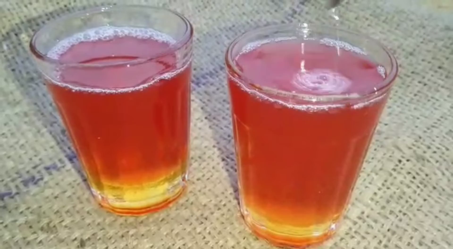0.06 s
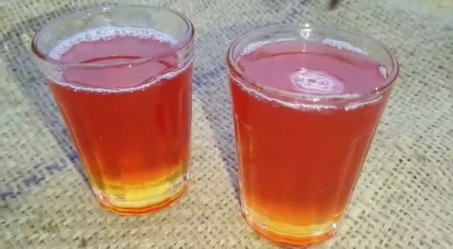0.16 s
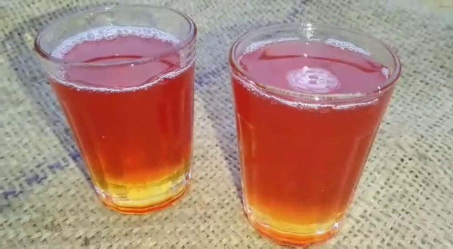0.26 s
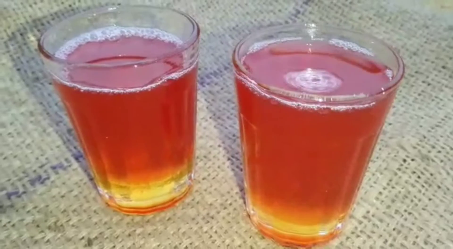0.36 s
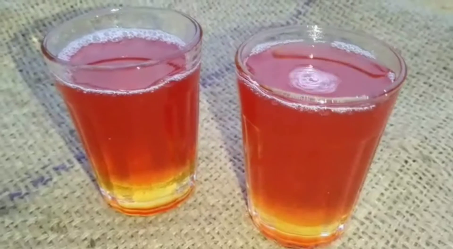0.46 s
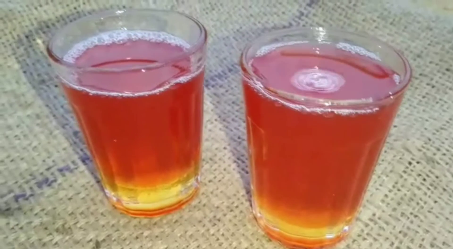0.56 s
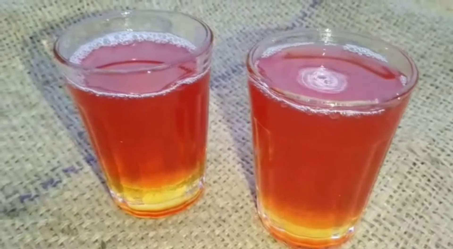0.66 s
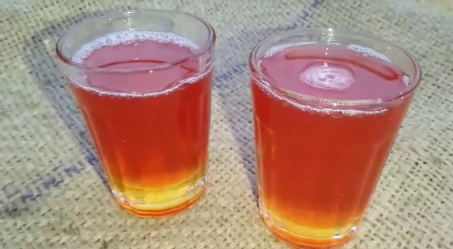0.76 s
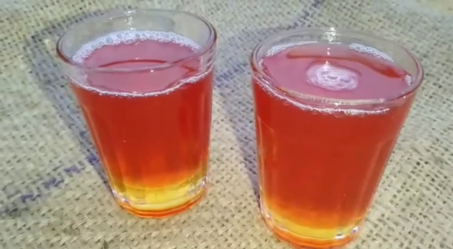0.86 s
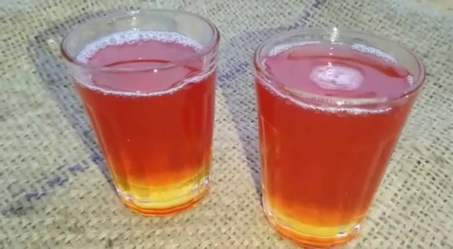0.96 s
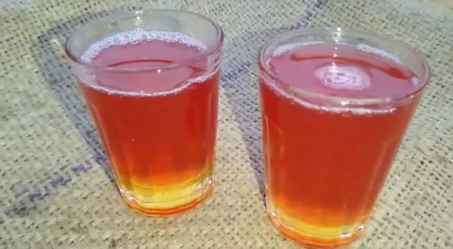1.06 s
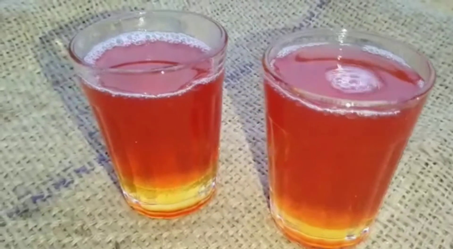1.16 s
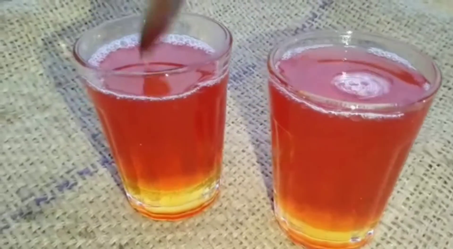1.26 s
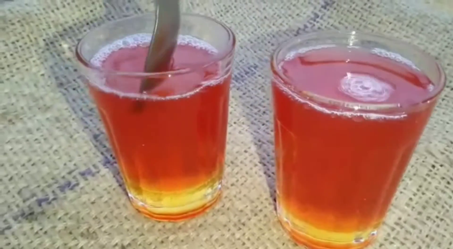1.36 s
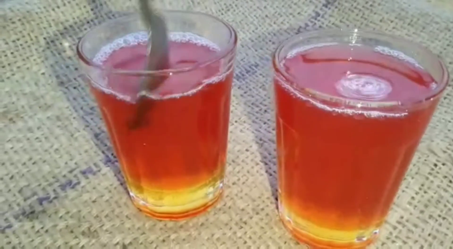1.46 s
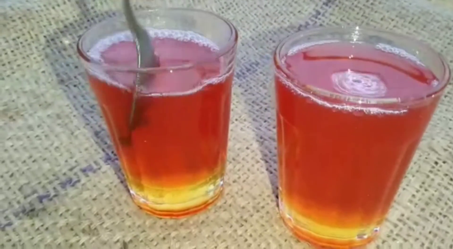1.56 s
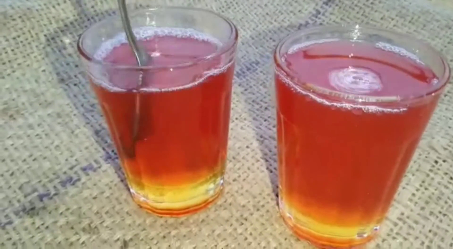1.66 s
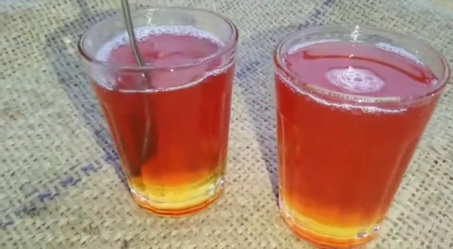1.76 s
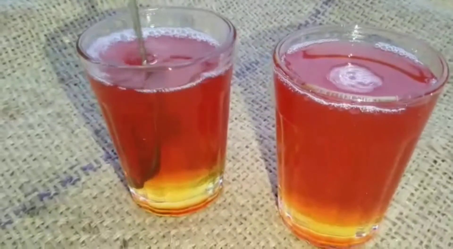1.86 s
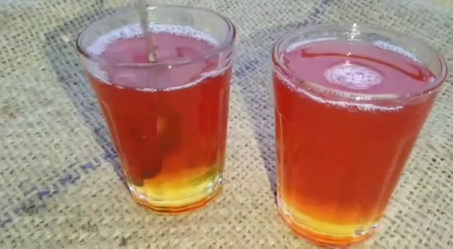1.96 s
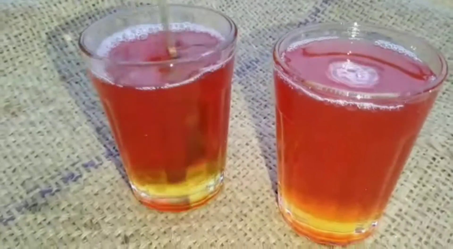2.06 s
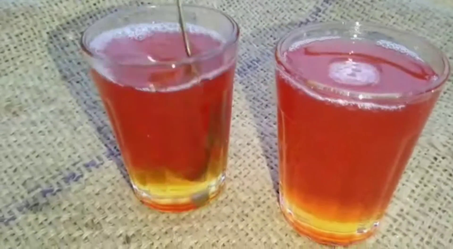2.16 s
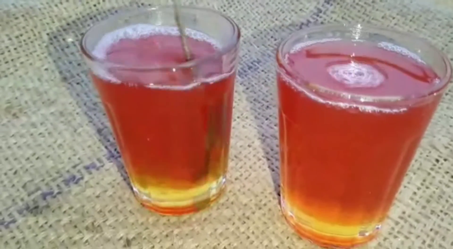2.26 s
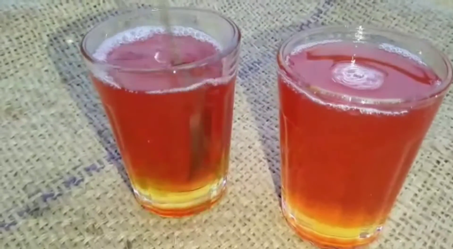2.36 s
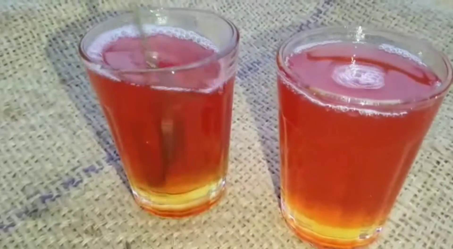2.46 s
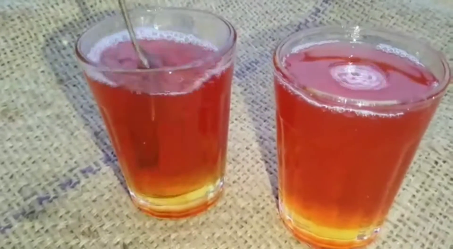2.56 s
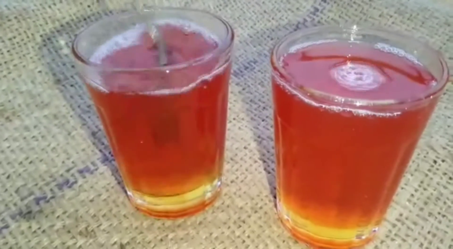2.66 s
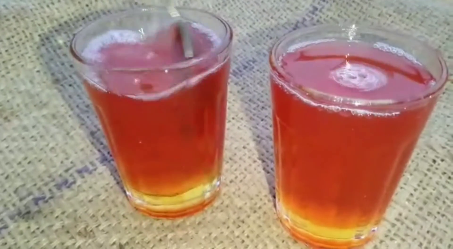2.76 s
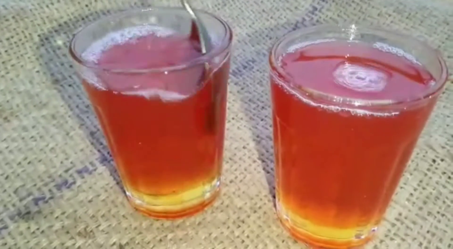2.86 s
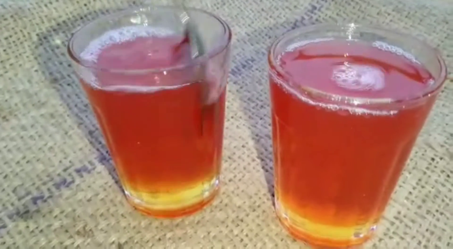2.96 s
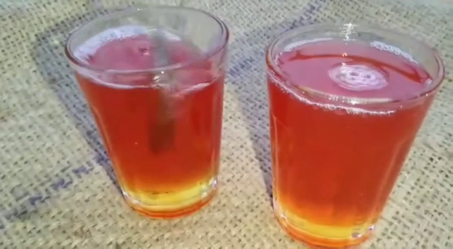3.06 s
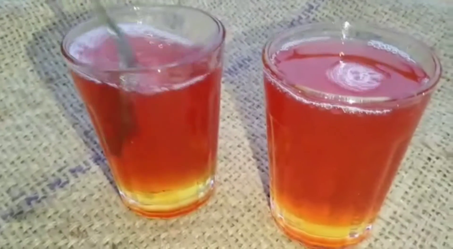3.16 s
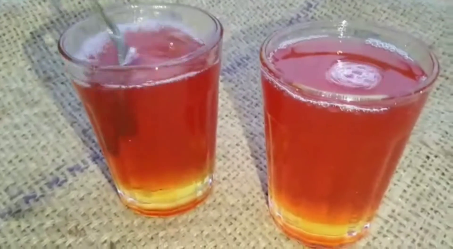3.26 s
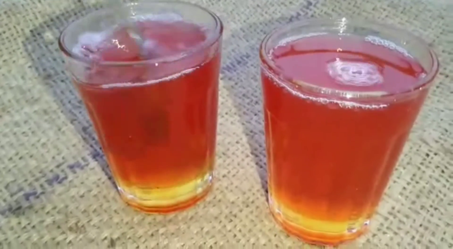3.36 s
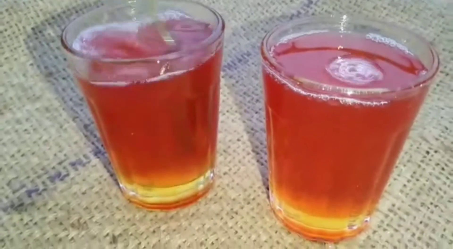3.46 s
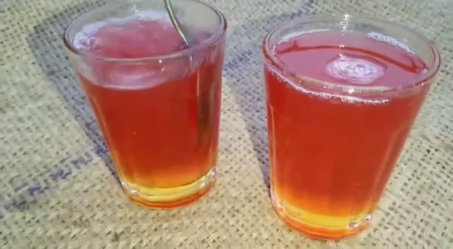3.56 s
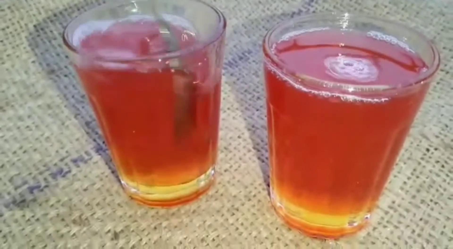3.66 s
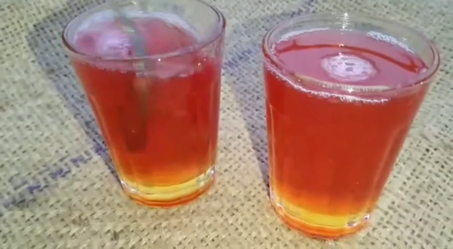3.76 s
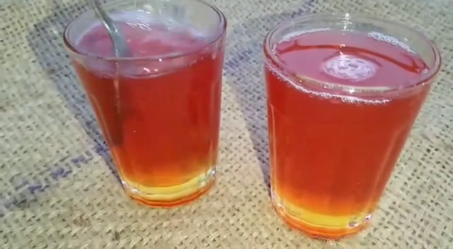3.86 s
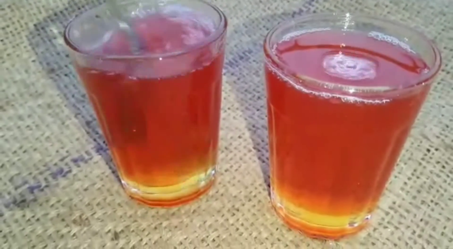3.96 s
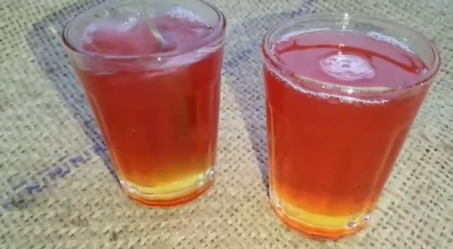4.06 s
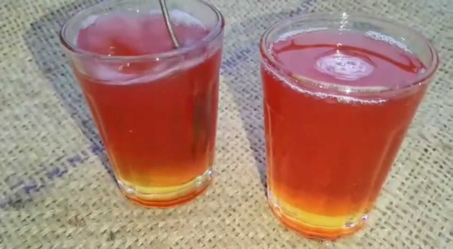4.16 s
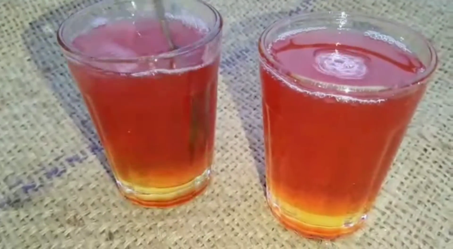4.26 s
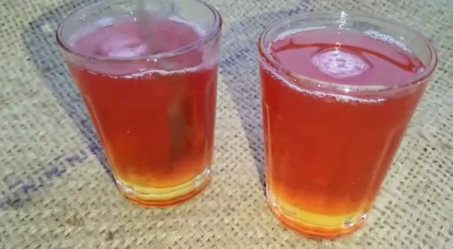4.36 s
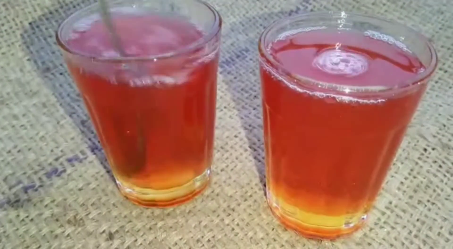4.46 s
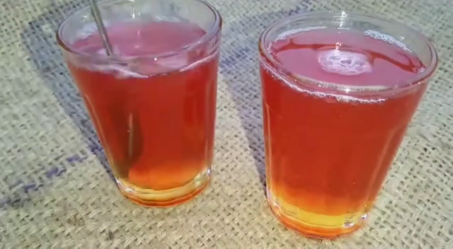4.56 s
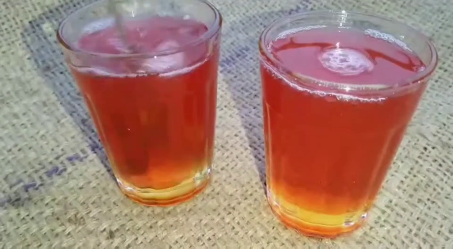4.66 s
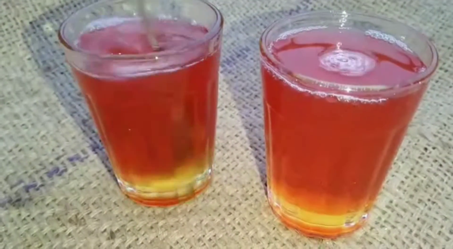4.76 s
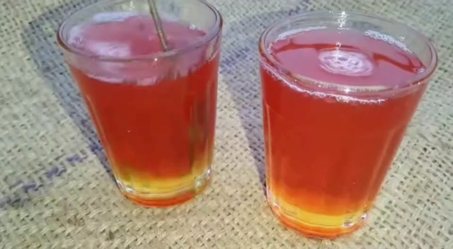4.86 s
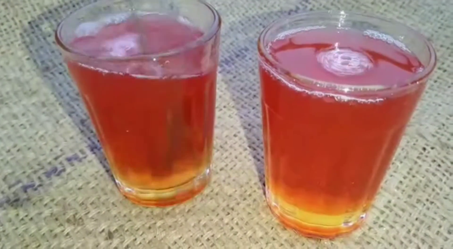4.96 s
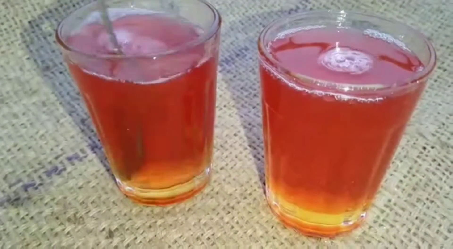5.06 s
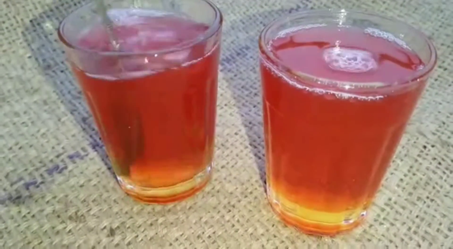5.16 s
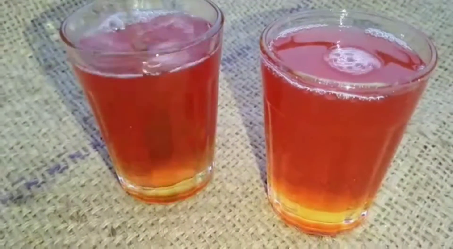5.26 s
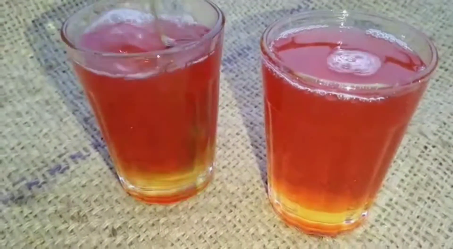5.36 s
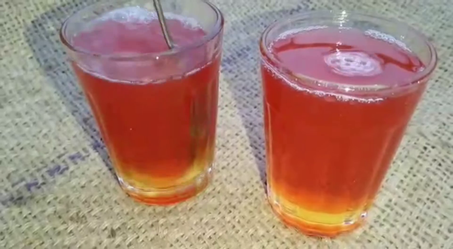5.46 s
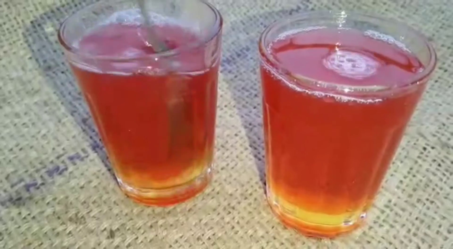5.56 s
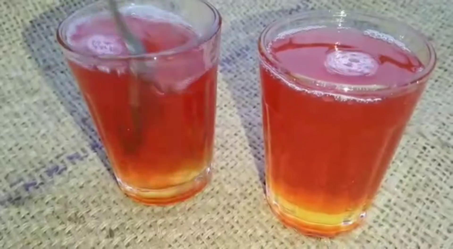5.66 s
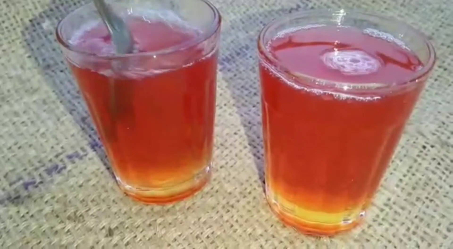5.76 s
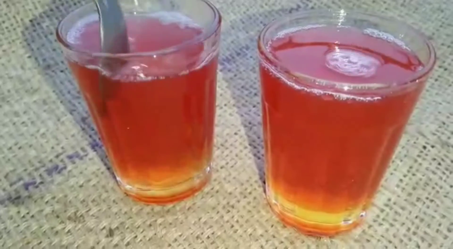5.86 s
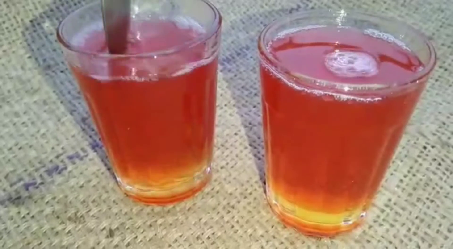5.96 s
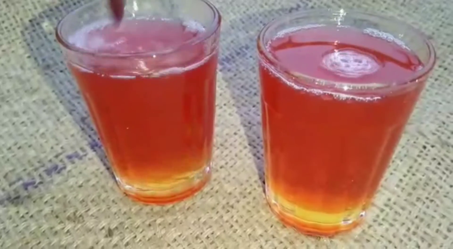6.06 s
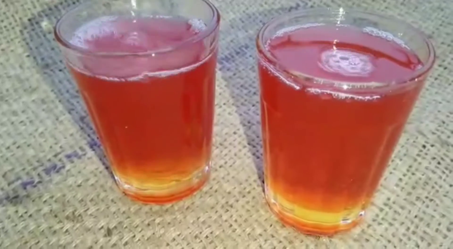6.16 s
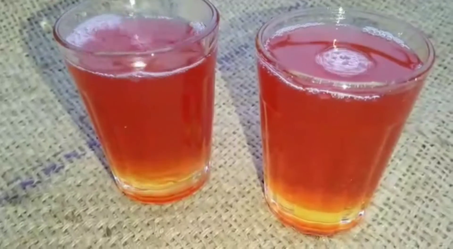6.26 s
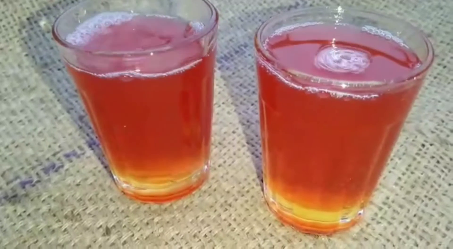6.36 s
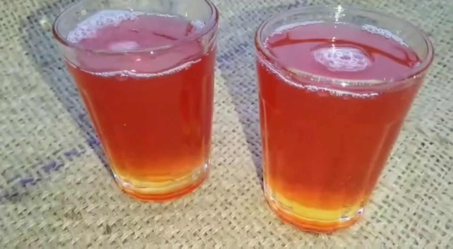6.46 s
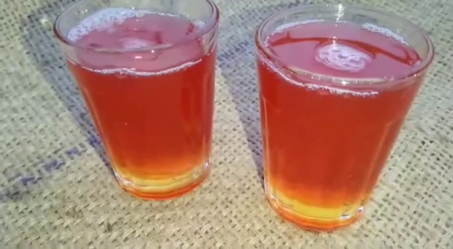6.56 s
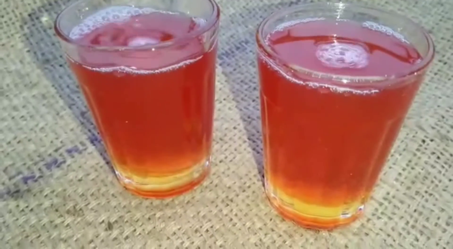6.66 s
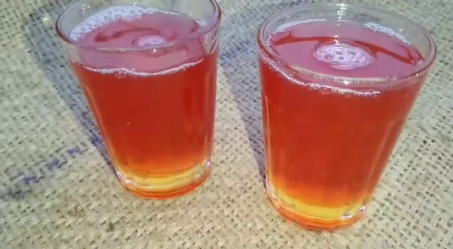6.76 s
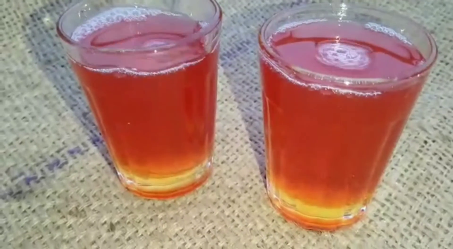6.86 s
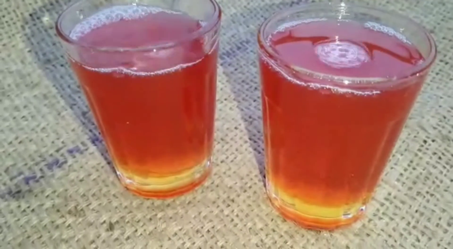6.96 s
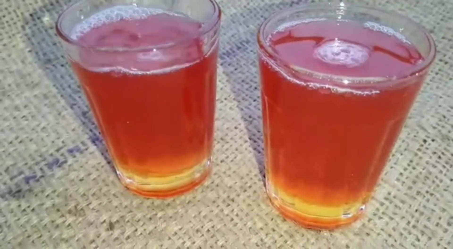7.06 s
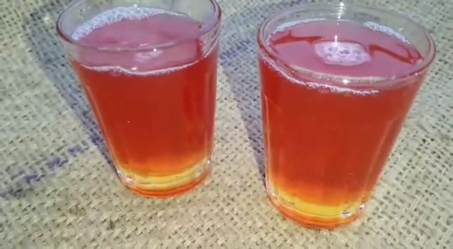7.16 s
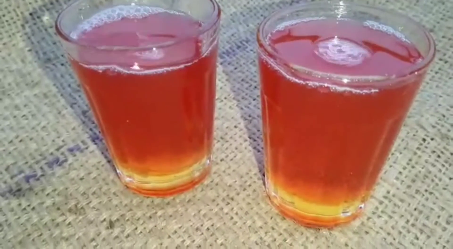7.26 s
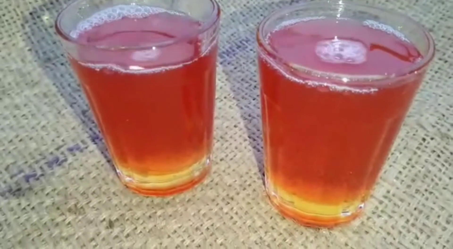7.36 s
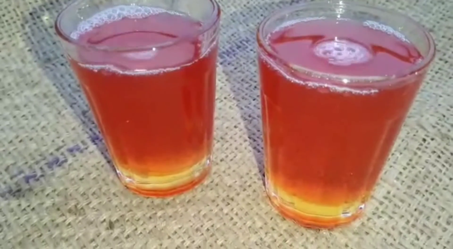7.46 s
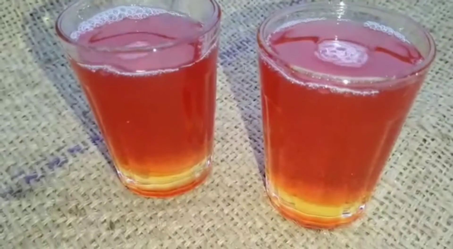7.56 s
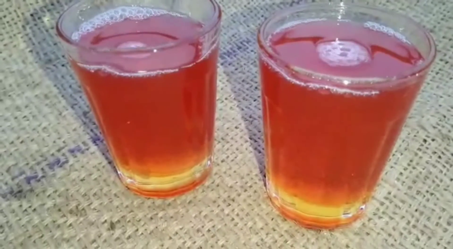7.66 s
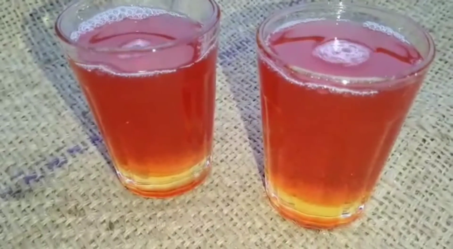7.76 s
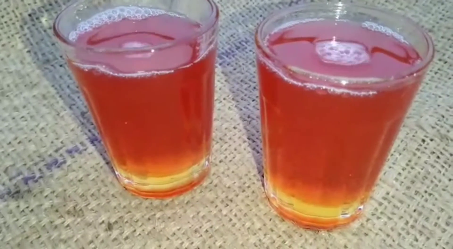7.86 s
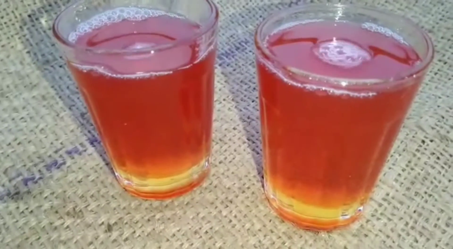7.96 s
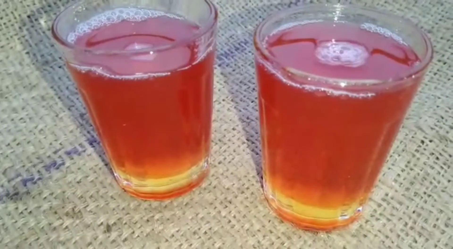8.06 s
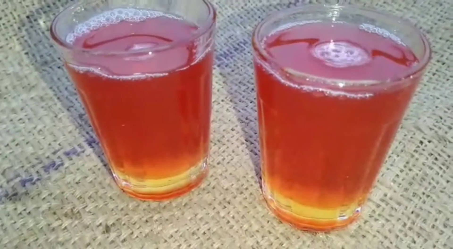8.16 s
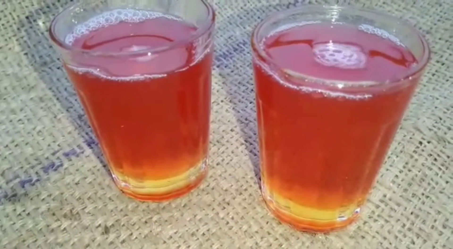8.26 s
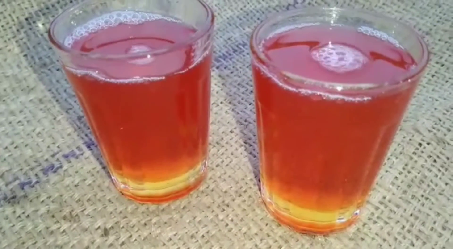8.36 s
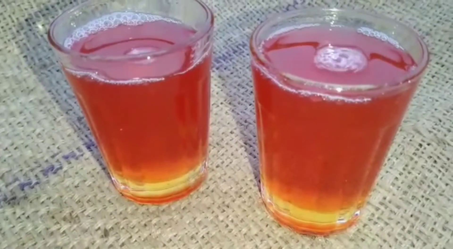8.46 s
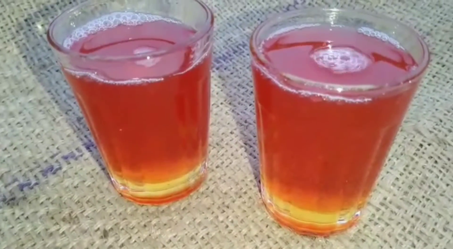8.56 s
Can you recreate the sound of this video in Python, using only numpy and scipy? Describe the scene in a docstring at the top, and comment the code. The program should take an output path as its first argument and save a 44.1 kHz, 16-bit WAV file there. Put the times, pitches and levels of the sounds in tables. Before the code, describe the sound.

Outdoors, close stereo microphones hear low airy rumble, a fast high insect chirp and a faint dove cooing. After about a second and a half a metal spoon enters a full thick glass and stirs, striking the walls in sharp, uneven clinks with brief sloshes. The stirring ends before six seconds, a small tap follows as the spoon leaves, then the quiet ambience returns with one small bird chirp.

```python
"""Stirring a drink outdoors

A steel spoon stirs a drink in a thick tumbler, close to a pair of microphones. Each knock rings a bank
of decaying modes under a short noise crack; the drink sloshes as swelling bands of noise. Around them:
rumble and hiss of banded noise, an insect chirping without pause on a repeated pitch curve before a
hissing chorus, a far dove and one small bird as blurred tones, and faint ticks of filtered noise."""
import sys
import numpy as np
from scipy import signal
from scipy.fft import rfft, irfft
from scipy.io import wavfile

SR = 44100
rng = np.random.default_rng(int(sys.argv[2]) if len(sys.argv) > 2 else 0)


def output_pcm(signal):
    """Save a mono or channel-first signal as 16-bit PCM at the path in sys.argv[1].

    Samples are clipped to [-1, 1] before scaling.
    """
    pcm = np.clip(np.atleast_2d(signal).T, -1, 1) * 32767
    wavfile.write(sys.argv[1], SR, np.round(pcm).astype(np.int16))


N = 379685


def amp(db):
    """dB to gain."""
    return 10 ** (np.asarray(db) / 20)


def rms_one(x):
    """Scale to rms 1."""
    return x / np.sqrt(np.mean(x ** 2) + 1e-20)


def in_time(rows):
    """Columns joined by straight lines over time."""
    time_s, *columns = np.transpose(rows)
    return [np.interp(np.arange(N) / SR, time_s, column) for column in columns]


def gate(rows, fade_s=0.012):
    """1 while a table lasts, fading to 0 at both ends."""
    first, last = rows[0][0], rows[-1][0]
    return np.interp(np.arange(N) / SR, [first - fade_s, first, last, last + fade_s], [0, 1, 1, 0])


def at_hz(hz_points, values, hz):
    """Read values on a log-frequency axis."""
    return np.interp(np.log(hz), np.log(hz_points), values)


def sides(pan_db):
    """Left and right gains for a left-right level difference."""
    return amp([pan_db / 2, -pan_db / 2])


def band(x, low_hz, high_hz):
    """Butterworth band-pass."""
    sos = signal.butter(2, [low_hz, min(high_hz, SR / 2.2)], "band", fs=SR, output="sos")
    return signal.sosfilt(sos, x)


def drift(rate_hz):
    """Slow random wander of rms 1: noise through two equal poles, computed every 40 samples."""
    step = 40
    pole = np.exp(-2 * np.pi * rate_hz * step / SR)
    noise = rng.standard_normal(N // step + 2002)
    slow = signal.lfilter([1], [1, -2 * pole, pole * pole], noise)[2000:]   # drop the run-in
    return np.interp(np.arange(N) / step, np.arange(len(slow)), rms_one(slow))


def add(out, start_s, sound):
    """Mix a sound in at a time."""
    i = round(start_s * SR)
    out[:, i:i + sound.shape[1]] += sound[:, :N - i]


def air():
    """Third-octave bands of noise; rumble and hiss swell on their own."""
    # spectrum: (frequency [Hz], relative density [dB per Hz])
    spectrum = [(25, -15.5), (40, -5.5), (53, 4), (70, -5.5), (95, -13), (136, -9), (188, -13),
                (250, -20.5), (400, -22.5), (800, -32), (1300, -36.5), (2000, -44.5), (2800, -38),
                (5700, -40), (10500, -42.5), (15100, -51.5)]
    # left-right correlation: (frequency [Hz], likeness [-1 to 1])
    likeness = [(60, .998), (150, .99), (290, .93), (640, .4), (1400, 0), (15000, 0)]
    # swells: (time [s], rumble gain [dB], hiss gain [dB])
    swells = [(0, -1.5, -1), (1.46, -3, 0), (2.57, 1.5, 6), (3.07, 3.5, 0), (3.3, -1, 3.5), (4.2, -2, 1),
              (4.87, -1, 2), (5.78, -3, 0.5), (6.28, -0.5, 1.5), (7.43, -4, -0.5), (8.18, -2.5, 4.5),
              (8.61, -5, 4.5)]
    air_gain_db = -24
    rumble_db, hiss_db = in_time(swells)
    gust = drift(13.0)   # the low bands swell together
    edges_hz = 22 * 2 ** np.arange(0, 9.7, 1 / 3)
    white = rng.standard_normal((2, 2, N + SR))   # one second of run-in
    out = 0
    for k, (low_hz, high_hz) in enumerate(zip(edges_hz, edges_hz[1:])):
        mid, side = band(white[k % 2], low_hz, high_hz)[:, SR:]   # neighbours get unrelated noise
        hz = np.sqrt(low_hz * high_hz)
        alike = np.clip(at_hz(*np.transpose(likeness), hz), -1, 1)
        rumbly = at_hz([300, 1200], [1, 0], hz)
        swell_db = rumbly * rumble_db + (1 - rumbly) * hiss_db
        wander_db = 1.9 * drift(14) + 1.6 * rumbly * gust
        gain = amp(at_hz(*np.transpose(spectrum), hz) + swell_db + air_gain_db + wander_db)
        pair = np.sqrt(1 + alike) * mid + np.sqrt(1 - alike) * side * [[1], [-1]]
        out = out + gain * pair
    return out


def insect():
    """One near singer repeats its chirp evenly, reaching the left a little later; a far chorus hisses."""
    # near singer: (time [s], relative level [dB])
    singer = [(0, -55.5), (3, -52.5), (5.6, -50), (5.85, -63.5), (6.2, -49), (6.6, -52.5), (6.8, -71.5),
              (7.1, -53), (8.61, -50.5)]
    # one chirp, loud as the pitch falls, faint as it climbs back:
    # (share of the period, pitch [Hz], relative level [dB])
    song = [(0, 8900, -5), (.12, 8850, 0), (.3, 8790, -8), (.38, 8800, -17), (.68, 9250, -21),
            (.83, 9550, -16), (.95, 8950, -6), (1, 8900, -5)]
    # far insects merged into bands of hiss: (centre [Hz], width [Hz], rms level [dB])
    chorus = [(7070, 1100, -72), (9400, 840, -70)]
    first_chirp_s, chirp_period_s = 0.0283, 0.08725
    pan_db, left_delay_s = -5, 0.0032
    level_db, = in_time(singer)
    cycles = ((np.arange(N) / SR - first_chirp_s) / chirp_period_s) % 1
    share, song_hz, song_db = np.transpose(song)
    pitch_hz = np.interp(cycles, share, song_hz)
    rasp = 1 + 0.55 * (drift(250) + 1j * drift(250))   # the scraping wing widens the line
    tone = np.real(rasp * np.exp(2j * np.pi * np.cumsum(pitch_hz) / SR))
    tone = tone * amp(np.interp(cycles, share, song_db) + level_db)
    left, right = sides(pan_db)
    near = np.array([left * np.roll(tone, round(left_delay_s * SR)), right * tone])
    far = 0
    for hz, width_hz, db in chorus:
        hiss = band(rng.standard_normal((2, N)), hz - width_hz / 2, hz + width_hz / 2)
        far = far + amp(db) * rms_one(hiss)
    return near + far


def whistle(rows, rough_db, rate_hz, width_hz, hoarse):
    """A tone on a pitch curve, blurred by distance: part steady, part narrow noise around the pitch."""
    hz, level_db = in_time(rows)
    blur = 1 + hoarse * (drift(width_hz) + 1j * drift(width_hz))
    tone = np.real(blur * np.exp(2j * np.pi * np.cumsum(hz) / SR))
    return gate(rows) * amp(level_db + rough_db * drift(rate_hz)) * tone


def coo(start_s, length_s, top_hz, end_hz, level_db):
    """A coo lifts to its top, then sags to its end."""
    top_share, rise_hz, start_db = 0.201, 20, -3
    return [(start_s, top_hz - rise_hz, level_db + start_db),
            (start_s + top_share * length_s, top_hz, level_db),
            (start_s + length_s, end_hz, level_db)]


def birds():
    """The dove is a soft wavering tone; the small bird a rough tone off to the right."""
    # dove: (start [s], length [s], top pitch [Hz], end pitch [Hz], relative level [dB])
    coos = [(0.102, .1, 712, 695, -69), (0.425, 0.17, 726, 637, -65), (0.762, .13, 710, 690, -63.5),
            (1.134, 0.59, 782, 666, -61.5), (2.504, 0.23, 705, 630, -63.5), (3.299, 0.237, 701, 645, -65),
            (3.828, 0.48, 733, 652, -64.5)]
    # small bird: (time [s], pitch [Hz], relative level [dB])
    chirp = [(7.63, 4080, -68), (7.71, 3850, -58.5), (7.79, 3750, -60), (7.88, 3820, -70)]
    dove = sum(whistle(coo(*row), rough_db=1.3, rate_hz=8, width_hz=34, hoarse=0.74) for row in coos)
    small = whistle(chirp, rough_db=1.5, rate_hz=60, width_hz=250, hoarse=1.6) / 2
    return np.array([dove, np.roll(dove, 8)]) + small * sides(-9.0)[:, None]   # right 8 samples later


def ticks():
    """Tiny bright clicks: decaying noise through a band-pass."""
    # faint ticks nearby: (time [s], level before the band-pass [dB], left-right difference [dB])
    clicks = [(0.1945, -42.5, 1.5), (0.2144, -44, 8), (0.29, -45, 1.0), (0.5496, -36, -8),
              (0.998, -48, 1.5), (1.3683, -43, 1.0), (6.8452, -44, -1.5), (7.1304, -52, -3)]
    out, t = np.zeros((2, N)), np.arange(300) / SR
    noises = rng.standard_normal((len(clicks), 2, len(t)))
    for (start_s, level_db, pan_db), noise in zip(clicks, noises):
        click = band(noise * amp(-60 * t / 0.015), 6900, 13400)   # t60 15 ms
        add(out, start_s, click * amp(level_db) * sides(pan_db)[:, None])
    return out


def slosh():
    """Each splash swells and fades: a lumpy low gurgle and a finer bright fizz."""
    # splashes of the drink: (time of top [s], half length [s], gurgle level [dB], fizz level [dB])
    splashes = [(1.484, 0.051, -55.5, -44.5), (2.527, 0.041, -64, -58.5), (2.583, 0.032, -55, -52),
                (2.712, 0.04, -48.5, -48.5), (2.73, .06, -55, -54), (2.89, 0.03, -37.5, -38),
                (2.967, 0.044, -42.5, -42.5), (3.079, 0.073, -47, -47), (3.429, 0.072, -54.5, -50.5),
                (4.23, 0.042, -63, -57.5), (8.3, 0.088, -65.5, -64)]
    edge_fall_db = 18   # at half a length from the top
    gurgle = rms_one(band(rng.standard_normal((2, N)) * amp(5 * drift(40)), 550, 1450))
    fizz = rms_one(band(rng.standard_normal((2, N)) * amp(1.5 * drift(80)), 1800, 14000))
    low, high, t = 0, 0, np.arange(N) / SR
    for top_s, half_s, gurgle_db, fizz_db in splashes:
        hump = amp(-edge_fall_db * ((t - top_s) / half_s) ** 2)
        low = low + amp(gurgle_db) * hump
        high = high + amp(fizz_db) * hump
    return low * gurgle + high * fizz


def knocks():
    """Each knock starts every mode and a crack; where the spoon lands sets group balance and ring time."""
    # knocks: (time [s], crack level [dB], crack t60 [s], then relative level [dB] of six mode groups:
    #          dull, main ring, groups led by 4.2, 7.1, 7.4 and 9.9 kHz; then main ring t60 [s, clipped],
    #          length share of the other modes, left-right [dB] of low modes, left-right [dB] of high modes)
    hits = [(1.638, -9.5, 0.016, -36.5, -16, -33, -25.5, -21.5, -30, 0.71, 1.14, 1.5, 1.5),
            (1.665, -14.5, 0.011, -55, -28.5, -33, -39, -24, -45, .4, 0.6, -22.5, 4),
            (1.679, -21, 0.014, -48, -29, -41, -36, -36, -43, .12, 0.6, 0, 2),
            (1.686, -21, .023, -43, -23.5, -35, -36, -30, -46, .37, 0.81, 0, -1),
            (1.697, -28, 0.025, -75, -35, -47, -46, -51.5, -52, 0.21, 1.6, -9, 0),
            (1.802, -21.5, 0.076, -45.5, -23.5, -18, -37.5, -33.5, -26.5, 0.16, 0.88, 0, 5.5),
            (2.013, -27, 0.025, -46, -44, -27.5, -75, -93, -56, .2, 0.54, -13, 9),
            (2.031, -39, 0.03, -56, -50, -76, -79, -84, -59, 0.19, 2.2, 0, 3),
            (2.164, -17, 0.065, -48, -21, -23.5, -34, -54.5, -19, 0.21, 0.95, 3, 12),
            (2.342, -11, .027, -64, -26.5, -23, -31, -35, -31, 0.2, 0.98, 4.5, 5),
            (2.367, -13, .018, -30, -20.5, -24, -17.5, -32, -25, 0.16, 0.56, -6, 3),
            (2.704, -8, 0.021, -50, -20, -25, -37, -79.5, -19.5, 0.11, 1.2, 3.5, 13.5),
            (2.764, -33, .022, -73, -66, -66, -59, -70, -48.5, .08, 1.4, 2, 13),
            (2.843, -29, .018, -74, -49, -67, -78, -64, -56, .08, .33, -11, -6),
            (2.883, -21.5, 0.017, -30, -43, -39, -56, -61, -61, 0.066, 1.26, -3, -11),
            (2.988, -21, 0.012, -49, -55, -50, -62, -57, -62, .03, 0.83, -1, -8),
            (3.053, -8.5, 0.012, -45.5, -27.5, -25, -30, -43, -30, .35, 0.31, -9, 8),
            (3.063, -19.5, 0.013, -30, -35.5, -22, -66, -37, -40, 0.19, 0.21, 2, -11),
            (3.289, -49, 0.018, -72, -51.5, -75, -56, -63, -76, 0.11, 0.79, -7, 1),
            (3.341, -34, 0.021, -74, -59, -49, -53, -69, -47, .04, .23, -5, -10),
            (3.401, -1.5, 0.0095, -37, -18.5, -7, -8.5, -18.5, -9.5, 0.15, 0.17, 4, 1.5),
            (3.539, -45, .02, -52, -53, -77, -61, -71, -51.5, 0.15, 1.3, 3, 3),
            (3.706, -0.5, 0.011, -41.5, -20, -17.5, -10.5, -31.5, -33, 0.013, 0.36, -3.5, -1.5),
            (3.87, -37, .019, -68, -49.5, -83, -79, -74, -64, 0.08, 1.5, 1.5, 0),
            (4.043, -13, 0.032, -60, -25.5, -34.5, -17, -41, -28, 0.082, 0.43, 4, -1),
            (4.063, -37, 0.027, -49, -37.5, -60, -66, -74, -70, 0.1, 0.86, 2, -2),
            (4.152, -26.5, 0.014, -84, -85, -85, -40, -33.5, -34, .3, 0.13, -14, -6),
            (4.349, -10.5, 0.023, -51, -16.5, -14, -16.5, -26.5, -32, 0.027, 0.43, 4, -18),
            (4.362, -30, .012, -70, -40, -60, -40, -54, -63, .2, .45, -21, -5),
            (4.38, -9.5, 0.013, -55, -41, -45, -45, -44, -29, 0.33, .86, 12, 19),
            (4.385, -8.5, 0.024, -51, -17, -36, -29, -50.5, -61, 0.063, 0.4, 0, -2),
            (4.73, -21, 0.037, -47, -23, -25, -27.5, -29, -23, 0.056, 0.6, 8.5, 2),
            (4.739, -18.5, 0.028, -49, -30.5, -26, -66, -67, -64, 0.19, .21, -2.5, 5),
            (4.794, -29.5, 0.031, -34, -29.5, -30.5, -30, -47, -46, 0.17, 0.6, 4, 0),
            (5.015, -8, .018, -38.5, -31, -34, -34, -47.5, -24.5, 0.036, 0.78, 12, 17.5),
            (5.022, -7, 0.019, -46, -20.5, -38, -33, -36, -29, 0.024, 0.52, -7, 7),
            (5.028, -29, 0.0091, -65, -36, -36, -31, -46, -61, 0.24, 0.93, -4, 0),
            (5.214, -39, .03, -56, -42, -82, -73, -80.5, -85, 0.066, 1.2, 1, 3),
            (5.297, -13, 0.026, -43.5, -24.5, -31, -30, -32.5, -18, 0.2, 0.43, 5.5, 5),
            (5.499, -38.5, 0.019, -74, -59, -69, -57, -79, -81, .03, 0.82, 7, 4),
            (5.537, -40, 0.012, -63, -59, -67, -76, -66, -70, 0.2, 1.6, 5.5, 1),
            (5.573, -13, 0.016, -53, -31, -18.5, -24.5, -28, -22, 0.062, 0.4, 11, 6.5),
            (5.603, -21.5, 0.016, -31, -28, -41, -32, -43, -35, 0.033, 0.98, 2.5, -1),
            (5.613, -23, 0.021, -41, -42.5, -44, -42, -61, -40, .06, 1.1, 26, 5),
            (5.626, -27.5, 0.027, -60, -45, -59, -56, -78, -68, 0.066, .5, 3, 4),
            (6.233, -16, 0.012, -79, -62, -45, -67, -31, -26, .05, 0.067, 5, -7.5),
            (6.28, -36, .02, -78, -85, -68, -62, -61, -38, .1, 0.17, -1, -3),
            (8.339, -38, 0.042, -39, -70, -66, -66, -73, -77, .25, 0.9, 0, -2),
            (8.365, -31, 0.016, -58, -64, -57, -62, -87, -52, .18, .28, 7, -15)]
    # spoon and tumbler ringing together, a row per mode:
    # (relative level [dB], t60 before length share [s], phase lead of the left [rad])
    modes = [(-5.5, 0.023, -0.8), (1, 0.027, 4), (-11, 0.017, -7.5), (2.5, 0.24, 2), (-3.5, .3, 3),
             (-15.5, .025, -5), (1.5, 0.033, 2.5), (3, 0.034, 5), (-1, 0.0091, -4.5), (4.5, 0.029, 0.96),
             (1, 0.029, -1.5), (3, 0.064, 1), (2, 0.15, 0.3), (8.5, 0.17, 3.5), (-9.5, 0.021, -14.5),
             (7.5, 0.077, 1.04), (1, 0.029, 6), (4.5, 0.041, 0.8), (-2.5, .09, 1.2)]
    # pitch of each mode before detuning: [Hz]
    modes_hz = np.array([930, 1500, 2250, 2960, 2995, 3170, 3470, 4245, 4680, 5510, 6240, 7100, 7365, 7420,
                         9310, 9915, 11110, 12585, 13390])
    # group each mode belongs to: [index, a half is shared by two]
    mode_groups = [0, 0, 0, 1, 1, 2, 2, 2, 2, 2.5, 3, 3, 4, 4, 5, 5, 3, 5, 4]
    # main ring, lower the more the drink covers what rings: (time [s], pitch [Hz])
    main_pitch = [(1.64, 2960), (1.8, 2955), (1.9, 3010), (2.02, 2910), (2.17, 2940), (2.24, 2955),
                  (2.34, 2890), (2.38, 2890), (2.55, 2950), (2.75, 2960), (3.05, 2870), (3.15, 3040),
                  (3.4, 2935), (3.47, 2955), (4.05, 2910), (4.38, 2880), (4.73, 2910), (4.92, 2905),
                  (5.02, 2865), (5.1, 2890), (5.2, 2880), (5.3, 2900), (5.43, 2940), (5.58, 2870)]
    # dull thumps through the table: (time [s], start level [dB], pitch [Hz])
    thumps = [(2.705, -37, 81), (2.883, -36.5, 88.8), (3.707, -51.5, 81.4), (4.382, -56, 83.4),
              (6.233, -35, 98.5)]
    main_mode, scatter_db = 3, 0.5
    contact_s, stop_s = 0.0014, 0.0012
    crack_colour = 0.46   # how far the crack takes on the balance of the groups
    crack_size = 2048

    out = np.zeros((2, N))
    t = np.arange(12000) / SR
    mode_db, t60_s, lead_rad = np.transpose(modes)
    is_main = np.isin(np.arange(len(modes)), [main_mode, main_mode + 1])   # a close pair, so it beats
    scatter = rng.standard_normal((len(hits), len(modes)))
    hiss = rng.standard_normal((len(hits), 2, crack_size))
    bins_hz = np.fft.rfftfreq(crack_size, 1 / SR) + 1   # + 1 keeps the log finite
    swell = 1 - np.exp(-(t / contact_s) ** 2)   # the contact lasts a moment, so the ring builds up
    free_s = np.append(np.diff(np.array(hits)[:, 0]), 1)
    for k, row in enumerate(hits):
        start_s, crack_db, crack_t60_s, *groups_db, main_t60_s, length, pan_low, pan_high = row
        pans_db = [pan_low, pan_high]

        struck_db = 20 * np.log10(np.interp(mode_groups, np.arange(len(groups_db)), amp(groups_db)))
        level = amp(mode_db + struck_db + scatter_db * scatter[k])
        left, right = level * sides(at_hz([4000, 8000], pans_db, modes_hz))
        lasts_s = np.where(is_main, np.clip(main_t60_s, 0.02, 0.4), t60_s * max(length, 0.05))
        decay = amp(-60 * t / lasts_s[:, None])

        detune = np.interp(start_s + t, *np.transpose(main_pitch)) / modes_hz[main_mode]
        main_turn_s = np.cumsum(detune) / SR
        other_turn_s = t * np.sqrt(detune[0])   # the other modes shift by half as much
        turn = 2 * np.pi * modes_hz[:, None] * np.where(is_main[:, None], main_turn_s, other_turn_s)
        ring_left = left @ (decay * np.sin(turn + lead_rad[:, None]))
        ring_right = right @ (decay * np.sin(turn))
        stop = np.exp(-np.maximum(t - free_s[k], 0) / stop_s)   # the next touch stills the ring
        sound = swell * stop * np.array([ring_left, ring_right])

        colour = amp(crack_colour * at_hz(modes_hz, struck_db, bins_hz))
        colour = colour * np.minimum(bins_hz / 900, 1) ** 2 / (1 + (bins_hz / 14500) ** 12)
        colour = colour * sides(at_hz([4000, 8000], pans_db, bins_hz))
        crack = rms_one(irfft(rfft(hiss[k]) * colour)) * amp(crack_db)
        crack_shape = np.sqrt(swell) * amp(-60 * t / max(crack_t60_s, 0.003))
        sound[:, :crack_size] += crack * crack_shape[:crack_size]
        add(out, start_s, sound)
    for start_s, level_db, hz in thumps:
        thump = amp(level_db - 60 * t / 0.19) * np.sin(2 * np.pi * hz * t)   # t60 0.19 s
        add(out, start_s, np.ones((2, 1)) * thump)
    return out


def echo(hits):
    """Scattered returns from the table and things nearby: a decaying noise tail, band-passed."""
    t60_s, level_db = 0.089, -8.5
    t = np.arange(SR // 5) / SR
    tail = rng.standard_normal((2, len(t))) * amp(-60 * t / t60_s)
    tail = tail / np.sqrt(np.sum(tail ** 2, axis=1, keepdims=True))
    echoes = signal.fftconvolve(hits, tail, axes=1)[:, :N]
    return amp(level_db) * band(echoes, 800, 14000)


def scene():
    """Knocks with a short diffuse tail over the surroundings."""
    surroundings = air() + insect() + birds() + ticks()
    hits = knocks()
    return surroundings + slosh() + hits + echo(hits)


def record(dry):
    """The microphones drop the deepest bass, peaks are rounded, the top is cut."""
    ceiling, cutoff_hz = 0.95, 16600
    light = signal.sosfilt(signal.butter(4, 32, "high", fs=SR, output="sos"), dry)
    rounded = ceiling * light / (1 + np.abs(light / ceiling) ** 4) ** 0.25
    return signal.sosfilt(signal.cheby2(12, 70, cutoff_hz, fs=SR, output="sos"), rounded)


dry = scene()
out = record(dry)
output_pcm(out)
```